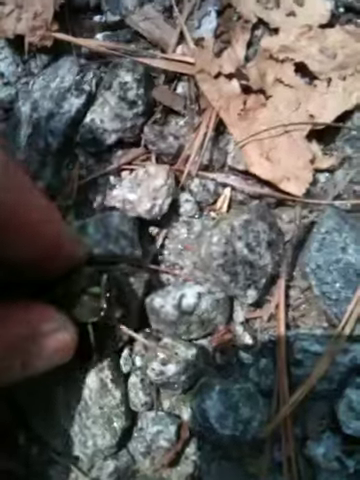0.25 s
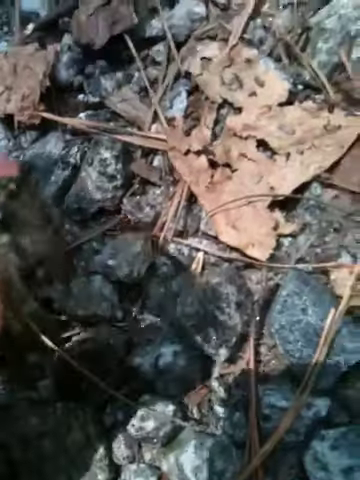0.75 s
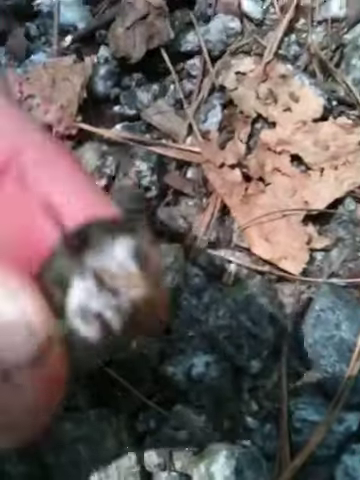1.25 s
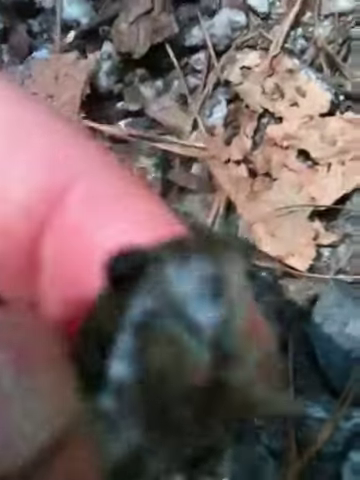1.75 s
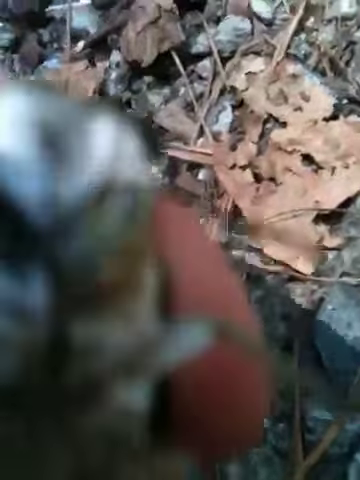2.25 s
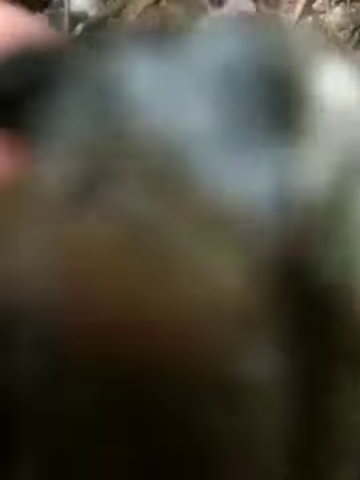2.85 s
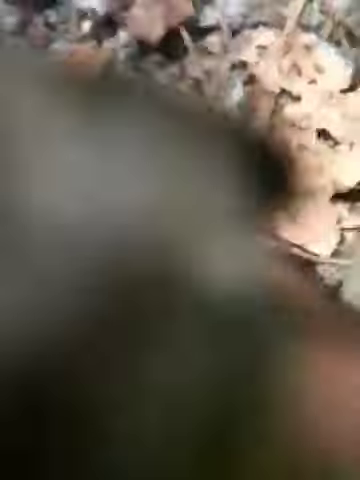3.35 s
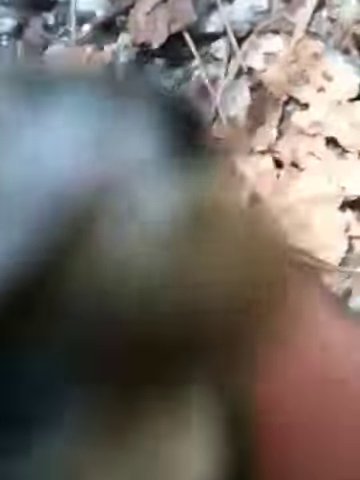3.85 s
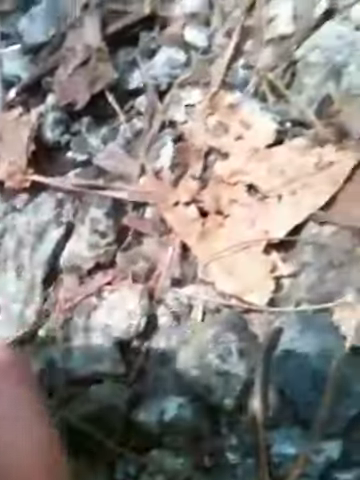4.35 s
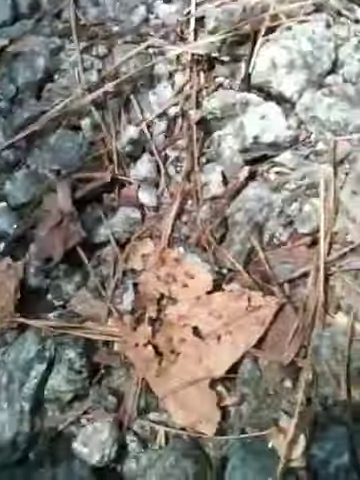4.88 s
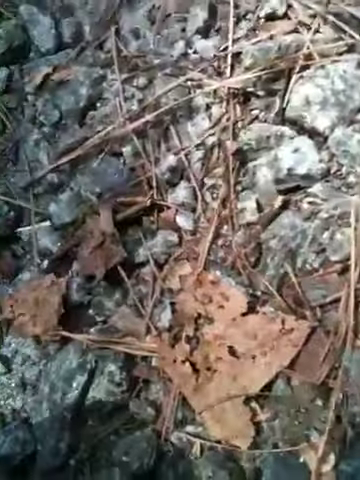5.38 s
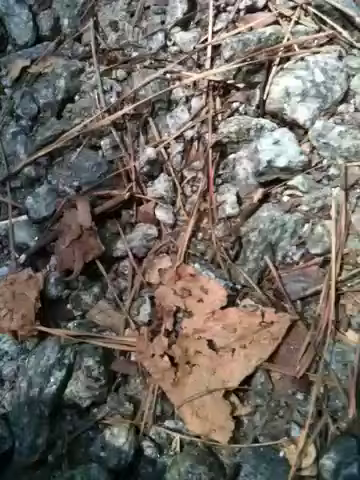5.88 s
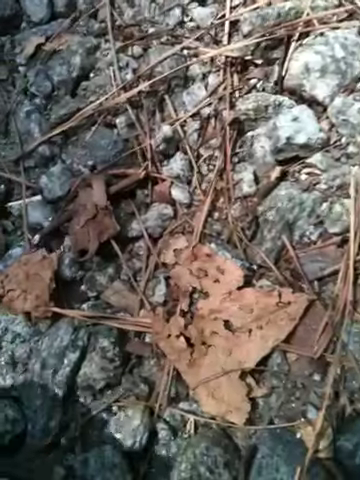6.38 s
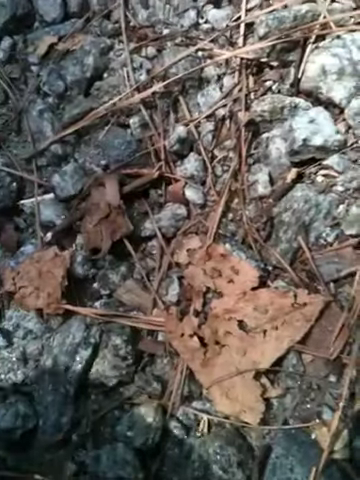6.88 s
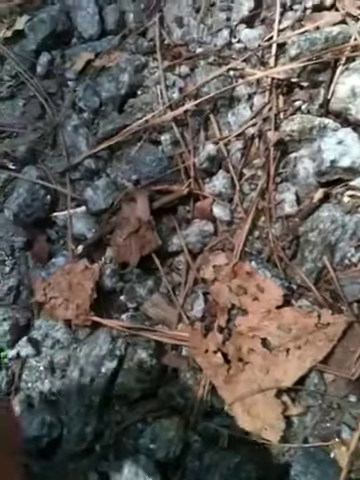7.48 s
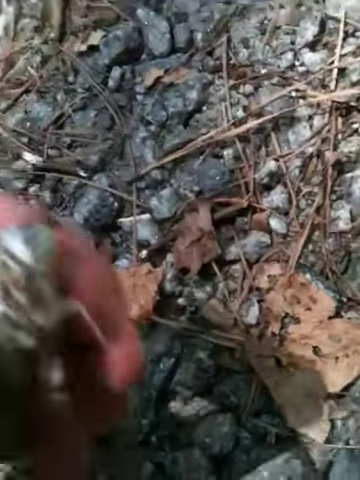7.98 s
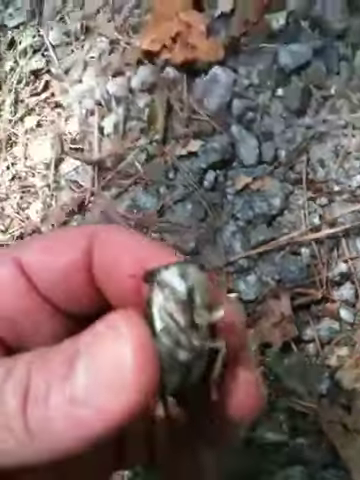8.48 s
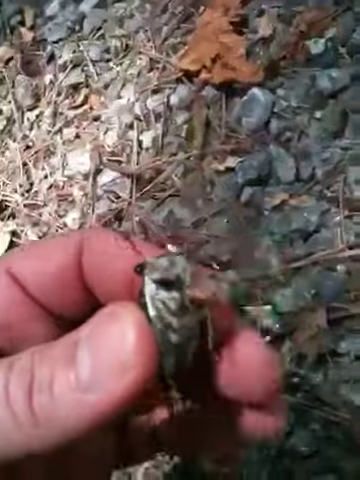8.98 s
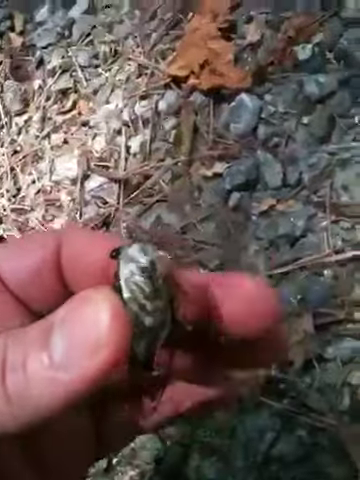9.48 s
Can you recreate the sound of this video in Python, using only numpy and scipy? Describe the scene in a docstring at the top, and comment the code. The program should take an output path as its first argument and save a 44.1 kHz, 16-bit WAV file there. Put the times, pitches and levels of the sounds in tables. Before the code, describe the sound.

Quiet outdoor air with soft hiss, thin insect whines and barely audible electrical buzz. A cicada held close to the microphone starts with weak, slowing stutters of bright double clicks at 0.05-0.35 s, then one faint click at 1.3. Far away a vehicle accelerates past, its low roar, drone and thin turbo whistle swelling to about 2.6 s and then fading, with a faint engine note lingering. Sharp, dry cicada rasps strike at 3.2, with a single click at 3.45, then a burst at 4.5-4.6. The hardest, slightly overloaded burst comes at 5.0-5.15. After a gap, a dense, overlapping rattle runs from 6.97 to about 7.4, weakening and breaking up. Tiny finger and grit ticks scatter throughout, clustering around 8.6; faint bird calls glide near 3.5, 6.2, 6.6, 7.7, 8.75 and 9.35. One weak click at 8.1 precedes a final thin, rapid buzz from 9.63 to the end.

```python
"""Cicada held between fingers

A cicada protests in stuttering bursts close to the microphone: each flex of a tymbal clicks in and back out
and rings the hollow abdomen. The loudest clicks overload the microphone; fingers and grit tick.
Far off a vehicle accelerates past: shaped noise for roar and drone, sines for engine, a noise band for turbo.
Noise bands make faint birds, insects and air; a comb of sines makes a trace of electrical buzz."""
import sys
import numpy as np
from scipy import signal
from scipy.fft import rfft, irfft, next_fast_len
from scipy.io import wavfile

SR = 44100
rng = np.random.default_rng(int(sys.argv[2]) if len(sys.argv) > 2 else 0)


def unload_wav(signal):
    """Save mono or channel-first audio to the path in sys.argv[1] as 16-bit WAV at rate SR, clipped to [-1, 1]."""
    wavfile.write(
        sys.argv[1],
        SR,
        np.round(np.clip(np.atleast_2d(signal).T, -1, 1) * 32767).astype(np.int16),
    )


N = 429093


def gain_of(db):
    """Decibels to amplitude."""
    return 10 ** (np.asarray(db) / 20)


def evened(x):
    """Scales to an rms of 1."""
    return x / np.sqrt(np.mean(x ** 2) + 1e-20)


def read(points, hz):
    """Reads a spectrum on a log-frequency axis."""
    point_hz, value = np.transpose(points)
    return np.interp(np.log(hz + 1), np.log(point_hz + 1), value)


def curves(rows):
    """Each column of a timed table, at every sample."""
    s, *columns = np.transpose(rows)
    return [np.interp(np.arange(N) / SR, s, column) for column in columns]


def add(mix, s, sound):
    """Mixes a sound in at time s."""
    part = mix[max(round(s * SR), 0):][:len(sound)]
    part += sound[:len(part)]


def noise(points):
    """Steady noise of rms 1 with the given spectrum."""
    size = next_fast_len(N)
    gain = gain_of(read(points, np.fft.rfftfreq(size, 1 / SR)))
    shaped = irfft(rfft(rng.standard_normal(size)) * gain, size)
    return evened(shaped[:N])


def drift(per_s):
    """Random wander of rms 1, with per_s straight segments a second."""
    knots = rng.standard_normal(4096)
    return evened(np.interp(np.arange(N) / SR * per_s, np.arange(len(knots)), knots))


def whistle(hz, width_hz):
    """A narrow band of noise of rms 1 that follows a pitch curve."""
    r = np.exp(-np.pi * width_hz / SR)
    z = rng.standard_normal(len(hz)) + 1j * rng.standard_normal(len(hz))
    envelope = signal.lfilter([1], [1, -2 * r, r * r], z)
    carrier = np.exp(2j * np.pi * np.cumsum(hz) / SR)
    return evened((envelope * carrier).real)


def bump(hz, centre_hz, width_hz):
    """A resonance peak of height 1."""
    return 1 / (1 + (2 * (hz - centre_hz) / width_hz) ** 2)


def tymbals(scatter_db=-8, rattle_db=-11, scatter_t60_s=0.012, detune=0.0084,
            abdomen_db=6, abdomen_width_hz=550, trim_db=-0.85, size=1024):
    """Every flex clicks twice; the fingers throw each click back within a few milliseconds."""
    # hold on the insect, nearest row in time applies: start_s, abdomen_hz, low_side_hz, finger_echo_ms,
    # echo_gain (0-1), side_resonance_db, treble_tilt_db_per_octave
    grips = np.array([(0.18, 4850, 3860, 0.42, 0.2, 5, 10.5), (1.29, 4900, 3900, 0.63, 0.6, 3, 4),
                      (3.22, 5420, 3810, 0.69, 0.05, 8, -6.5), (3.45, 5300, 3760, 0.6, 0.25, 7, -2),
                      (4.57, 5333, 3730, 0.42, 0, -4, -3), (5.08, 5420, 3850, 0.3, 0.27, -2, -1.5),
                      (7.03, 5030, 3870, 0.336, 0.46, 0, -6), (7.23, 4990, 3750, 0.84, 0.34, -6, -6),
                      (8.09, 6030, 4280, 0.296, 0.33, 7.5, 7), (9.67, 5720, 3980, 0.727, 0.48, 6.5, 4.5)])
    hz, t, out = np.fft.rfftfreq(size, 1 / SR), np.arange(size) / SR, np.zeros(N)
    fade = gain_of(-60 * t / scatter_t60_s) * (1 - np.exp(-(t / 0.00066) ** 2))
    fade /= np.linalg.norm(fade)
    # each grip has its own pattern of small reflections
    scatter = gain_of(scatter_db) * rfft(rng.standard_normal((len(grips), size)) * fade)
    lag = swell(hz, centre_hz=5344, width_hz=2800) * swell(hz, centre_hz=9240, width_hz=2900)
    for s, db, wait_ms, back_db in flexes():
        grip = np.argmin(abs(grips[:, 0] - s))
        _, abdomen_hz, side_hz, echo_ms, echo, side_db, tilt_db = grips[grip]
        held_db = body_db(hz, side_hz, side_db, tilt_db)
        paths = 1 + echo * np.exp(-2j * np.pi * hz * echo_ms / 1000) + scatter[grip]
        click_in = (s, gain_of(db))
        click_out = (s + wait_ms / 1000, -gain_of(db + back_db))
        for start_s, push in [click_in, click_out]:
            # the abdomen's own resonance shifts a little with each strain
            strained_hz = abdomen_hz * (1 + detune * rng.standard_normal())
            hollow_db = abdomen_db * bump(hz, strained_hz, abdomen_width_hz)
            ring = ringing(held_db + hollow_db)
            # ribs and wings rattle briefly after each click, never twice alike
            rattle = gain_of(rattle_db) * rfft(rng.standard_normal(size) * fade)
            click = irfft(rfft(ring) * (paths + rattle) * lag)
            onset_rms = np.sqrt(np.mean(click[:SR // 1000] ** 2))  # first millisecond
            add(out, start_s - .00015, push * click / onset_rms)
    return gain_of(trim_db) * out


def flexes(snap_back_db=-3, uneven_db=0.55, uneven_wait_ms=.06):
    """Uneven flexes in runs, most slowing as the muscle tires: (s, dB, wait ms, snap-back dB)."""
    # runs of flexes of one tymbal, both work where rows overlap: start_s, flexes (count), first_gap_ms,
    # gap_growth_ms, level_before_trim_db, change_per_flex_db, wait_to_snap_back_ms
    spasms = [(0.0526, 3, 11.4, 8.6, -30, -.5, 1.55), (0.1172, 2, 15.4, 0, -29, -1, 1.5),
              (0.2295, 6, 10, 2.4, -26, -.4, 1.6), (1.2873, 1, 0, 0, -26, 0, 2.1),
              (3.1971, 3, 12.5, 3.2, -13.5, 0, 2.3), (3.2179, 2, 16.1, 0, -10.5, -2, 2.1),
              (3.4509, 1, 0, 0, -14.3, 0, 2.3), (4.5154, 6, 11.2, .6, -12.8, .4, 2.25),
              (4.5474, 3, 10.4, 2.7, -10, .6, 1.8), (4.6301, 1, 0, 0, -11, 0, 2.6),
              (5.0237, 6, 11.65, 1.7, -7.4, .1, 2.35), (5.0552, 1, 0, 0, -6, 0, 2.1),
              (5.0915, 2, 15.5, 0, -6.6, 1, 2.1), (5.1371, 1, 0, 0, -7, 0, 2.4),
              (6.9662, 1, 0, 0, -10.3, 0, 2.3), (7.0057, 4, 9.6, 1, -10.5, -1.4, 2.42),
              (7.0127, 4, 9.8, 1.3, -8.3, -1.9, 1.95), (7.0523, 4, 10.1, 1.05, -12.8, .8, 2.45),
              (7.0592, 4, 9.9, 1.65, -10.5, .7, 2), (7.1092, 8, 12.4, -.36, -12.7, -.4, 2.45),
              (7.1414, 6, 9.6, .8, -12.3, -.6, 1.9), (7.212, 2, 20.3, 0, -16.8, .4, 2.3),
              (7.3095, 3, 13.2, 2.9, -14.6, -1, 1.85), (7.3153, 2, 31.8, 0, -16.7, -.8, 2.15),
              (8.0923, 1, 0, 0, -26, 0, 1.5), (9.6334, 5, 10.1, -.7, -19, 0, 1.95),
              (9.6578, 8, 7.5, .92, -18.8, -1.3, 2.4), (9.6783, 5, 10.4, .5, -19.5, -1.7, 1.85)]
    for start_s, count, gap_ms, slowing_ms, db, change_db, wait_ms in spasms:
        for k in range(round(count)):
            force, wait, back = rng.standard_normal(3)
            s = start_s + (k * gap_ms + k * (k - 1) / 2 * slowing_ms) / 1000
            flex_db = db + k * change_db + uneven_db * force
            yield s, flex_db, wait_ms + uneven_wait_ms * wait, snap_back_db + uneven_db * back


def body_db(hz, side_hz, side_db, tilt_db):
    """The squeeze shifts the lower resonances, frees or damps both side ones and aims the treble."""
    # ring of tymbals and body: frequency_hz, relative_level_db
    body = [(300, -53), (2650, -38), (3300, -18.5), (3800, -8), (4400, -6.5), (4900, 0.5), (5400, -3),
            (5900, -0.5), (6800, -3.5), (7950, -6.5), (9150, 0.5), (10200, -6.5), (11700, -19),
            (16000, -54.5)]
    rest_hz, high_side_hz, side_width_hz = 3860, 7084, 810  # rest_hz: lower side resonance unsqueezed
    beam_hz = 6200  # directional above this
    unsqueezed_hz = np.interp(hz, [0, side_hz, beam_hz, SR], [0, rest_hz, beam_hz, SR])
    sides = bump(hz, side_hz, side_width_hz) + bump(hz, high_side_hz, side_width_hz)
    tilt = tilt_db * np.log2(np.maximum(hz / beam_hz, 1))
    return read(body, unsqueezed_hz) + side_db * sides + tilt


def ringing(db):
    """The causal, minimum-phase ring of an object with this gain spectrum."""
    log_gain = np.log(gain_of(np.concatenate([db, db[-2:0:-1]])))
    return np.fft.ifft(np.exp(np.conj(signal.hilbert(log_gain)))).real


def swell(hz, centre_hz, width_hz):
    """A resonance builds up slightly behind the rest of the click, at unchanged level (all-pass)."""
    pole = centre_hz ** 2 - hz ** 2 + 1j * hz * width_hz
    return np.conj(pole) / pole


def outdoors(x, wet_db=-43, t60_s=0.39):
    """A very faint decaying-noise tail from trees and ground."""
    t = np.arange(SR // 2) / SR
    tail = rng.standard_normal(len(t)) * gain_of(-60 * t / t60_s)
    return gain_of(wet_db) * signal.fftconvolve(x, tail / np.linalg.norm(tail))[:N]


def ticks(cycles=40, trim_db=-1, faint_db=-52, faint_hz=6500, count=24):
    """Tiny dry snaps of fingers and grit, fainter ones at random times; the low ones last longer."""
    # clearer ticks: start_s, peak_before_trim_db, centre_hz
    clear = [(1.242, -35, 7040), (1.531, -43.5, 5850), (3.684, -36, 12000), (4.486, -41, 10000),
             (6.614, -41.5, 4500), (7.527, -48, 4430), (7.919, -44, 4930), (8.538, -46, 1100),
             (8.584, -47, 5000), (8.624, -44, 9200), (8.684, -47, 2000), (9.052, -43.5, 8520)]
    t, out = np.arange(SR // 25) / SR, np.zeros(N)
    faint = [(when * N / SR, faint_db + 6 * (force - .5), faint_hz * 2 ** (pitch - .5))
             for when, force, pitch in rng.random((count, 3))]
    for s, db, hz in [*clear, *faint]:
        band = signal.butter(2, [hz * 0.47, min(hz * 1.68, SR / 2 - 1000)], "band", fs=SR)
        burst = rng.standard_normal(len(t)) * gain_of(-60 * t * hz / cycles)
        snap = signal.lfilter(*band, burst)
        add(out, s, gain_of(db + trim_db) * snap / abs(snap).max())
    return out


def vehicle(pipe_db=-9, turbo_width_hz=230):
    """Tyre roar and exhaust drone swell and fade; engine note and turbo climb between gear changes."""
    # turbo whistle: time_s, pitch_hz, level_db
    turbo = [(0, 6600, -74), (.3, 6350, -66.5), (.55, 5750, -68.5), (1.2, 5820, -66.5), (2, 5963, -62.5),
             (2.5, 6196, -54.5), (2.85, 6400, -55.5), (3.15, 6700, -65.5), (3.9, 7490, -85)]
    # tyre roar spectrum: frequency_hz, relative_level_db
    roar_spectrum = [(30, -37.5), (100, -18.5), (200, -2.5), (400, -2), (650, -1), (1100, -2.5),
                     (1500, -5.5), (2200, -14), (3200, -16), (5000, -16), (8000, -16.5), (9500, -27.5),
                     (16000, -37)]
    # exhaust drone spectrum: frequency_hz, relative_level_db
    drone_spectrum = [(30, -52.5), (70, -31.5), (120, -9), (150, -7.5), (182, 1.5), (240, -3), (300, -2.5),
                      (380, -11.5), (600, -28.5), (2000, -59)]
    turbo_hz, turbo_db = curves(turbo)
    roar_db = passing(top_db=-56, fall_db=9.5) + .5 * drift(21)
    roar = gain_of(roar_db) * noise(roar_spectrum)
    # two hollow pipe resonances colour the drone
    pipe = whistle(np.full(N, 298), width_hz=50) + whistle(np.full(N, 630), width_hz=150)
    drone = gain_of(passing(top_db=-54, fall_db=13)) * (noise(drone_spectrum) + gain_of(pipe_db) * pipe)
    spin = gain_of(turbo_db + 0.76 * drift(9.2)) * whistle(turbo_hz, turbo_width_hz)
    return roar + drone + engine() + spin


def passing(top_db, fall_db, nearest_s=2.65, pass_s=0.41):
    """top_db when nearest, fall_db less at ten times the distance; pass_s to cover the nearest distance."""
    distance = np.hypot(1, (np.arange(N) / SR - nearest_s) / pass_s)
    return top_db - fall_db * np.log10(distance)


def engine(trim_db=-1, waver=0.0043):
    """The firing note, and its overtones ringing the exhaust pipe as the revs climb."""
    # revs, with two gear changes: time_s, firing_rate_hz, firing_note_before_trim_db
    revs = [(0, 77.3, -93), (.7, 60.3, -80), (1.3, 62.2, -78), (2.5, 69.51, -88), (3.9, 77.3, -69),
            (4.8, 81.1, -75), (5.7, 86.2, -69.5), (7.05, 90.5, -71.5), (7.6, 59.95, -89.5),
            (8.4, 59.7, -80), (9.73, 59.35, -80)]
    # exhaust overtones: multiple of the firing rate, relative_level_db
    orders = [(1.5, -4), (2, -2.5), (2.5, -1), (3, -1), (3.5, -9.5), (4, -3), (4.5, -5)]
    # pipe resonances: centre_hz, width_hz, peak_db
    pipe_modes = [(94, 8, -4.5), (179.5, 14, -1), (204.4, 14, 0), (290, 8.8, 0)]
    hz, level_db = curves(revs)
    turn = 2 * np.pi * np.cumsum(hz * (1 + waver * drift(8.9))) / SR
    boom_db = passing(top_db=-52, fall_db=21)
    out = gain_of(level_db + trim_db) * np.sin(turn)
    for multiple, db in orders:
        ring = sum(gain_of(peak_db) * bump(multiple * hz, centre_hz, width_hz)
                   for centre_hz, width_hz, peak_db in pipe_modes)
        out += gain_of(boom_db + db + 1.5 * drift(8.8)) * ring * np.sin(multiple * turn)
    return np.sqrt(2) * out  # sine levels are rms


def summer_air(air_db=-64.5):
    """A soft hiss of far insects, a few thin steady electrical whines and a few distant gliding bird calls."""
    # hiss spectrum: frequency_hz, relative_level_db
    air = [(30, -26), (60, -6.5), (120, 9), (1200, -0.5), (2200, -5), (3100, -12.5), (4500, -15),
           (5600, -15), (7000, -15.5), (8000, -10), (9200, -12.5), (12000, -13.5), (15500, -11)]
    # electrical whines and a far insect band: centre_hz, width_hz, level_db
    whines = [(1143, 30, -77.5), (1287, 8, -81), (2255, 10, -82), (8090, 520, -76.5)]
    # bird calls: start_s, length_s, start_hz, end_hz, width_hz, level_before_fades_db
    birds = [(3.463, 0.098, 3650, 3730, 150, -69), (6.202, 0.24, 7430, 7830, 800, -67.5),
             (6.63, 0.32, 3450, 3760, 240, -71), (7.701, .25, 7400, 7700, 796, -70),
             (8.752, .25, 7700, 7350, 690, -68.5), (9.348, 0.11, 6500, 7900, 500, -73)]
    out = gain_of(air_db) * noise(air)
    for hz, width_hz, db in whines:
        out += gain_of(db) * whistle(np.full(N, hz), width_hz)
    for s, length_s, start_hz, end_hz, width_hz, db in birds:
        glide = np.linspace(start_hz, end_hz, int(length_s * SR))
        fades = signal.windows.tukey(len(glide), .5)
        add(out, s, gain_of(db) * whistle(glide, width_hz) * fades)
    return out


def buzz(spacing_hz=58.57, uneven_db=2.5, count=120):
    """Faint electrical buzz: a steady comb of thin overtones, some stronger than others."""
    # overtone levels before the random unevenness: frequency_hz, level_db
    overtones = [(900, -93), (1200, -86), (1700, -95), (3200, -96), (4000, -91), (4450, -84.5), (4900, -88),
                 (5500, -93), (7000, -98)]
    k = np.arange(SR // 3000, count)
    level, phase = rng.standard_normal(len(k)), rng.random(len(k))
    line_db = read(overtones, k * spacing_hz) + uneven_db * level
    lines = np.zeros(N // 2 + 1, complex)
    bins = np.round(k * spacing_hz * N / SR).astype(int)
    lines[bins] = gain_of(line_db) * np.exp(2j * np.pi * phase)
    return irfft(lines, N) * N / np.sqrt(2)


def scene():
    """The cicada in front of its quiet surroundings."""
    cicada = tymbals()
    return (cicada + outdoors(cicada) + ticks() + vehicle() + summer_air() + buzz())[None]


def record(dry, ceiling=.66, knee=8, edge_hz=16400):
    """The loudest clicks flatten against the ceiling, at twice the sample rate; then the band limit."""
    fine = signal.resample_poly(dry, 2, 1, axis=1)
    flattened = fine / (1 + abs(fine / ceiling) ** knee) ** (1 / knee)
    clipped = signal.resample_poly(flattened, 1, 2, axis=1)
    low_pass = signal.firwin(511, edge_hz, window=("kaiser", 9), fs=SR)
    return signal.oaconvolve(clipped, low_pass[None], "same")


dry = scene()
out = record(dry)
unload_wav(out)
```